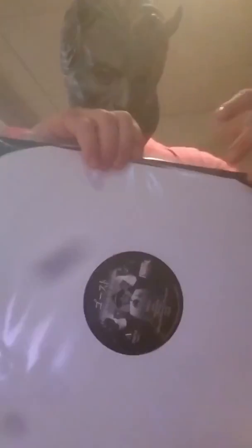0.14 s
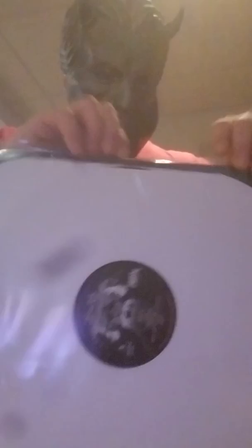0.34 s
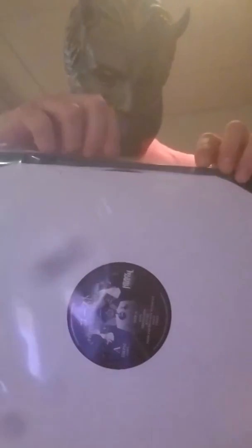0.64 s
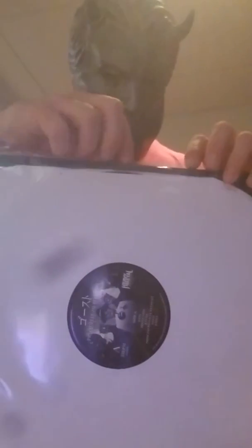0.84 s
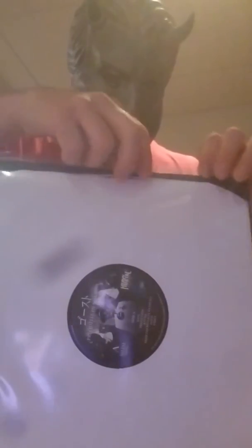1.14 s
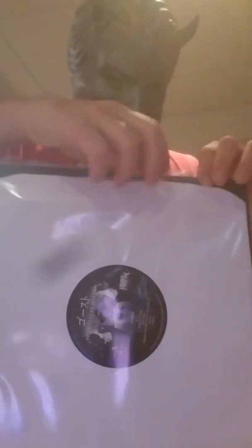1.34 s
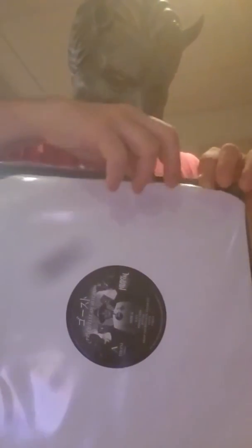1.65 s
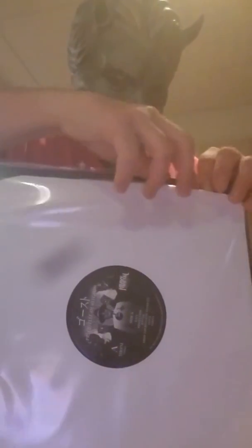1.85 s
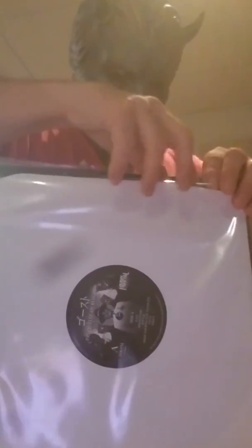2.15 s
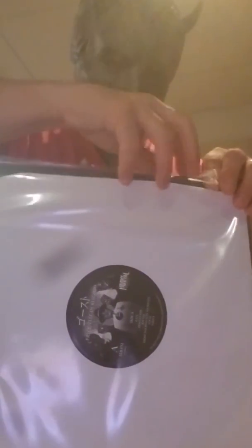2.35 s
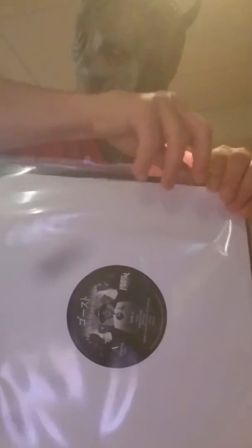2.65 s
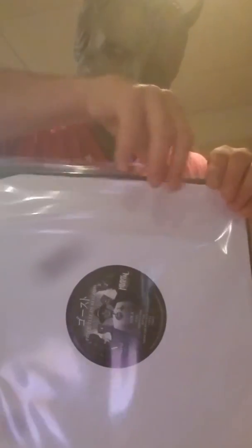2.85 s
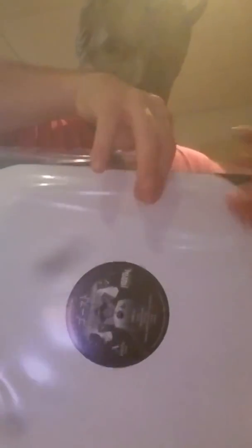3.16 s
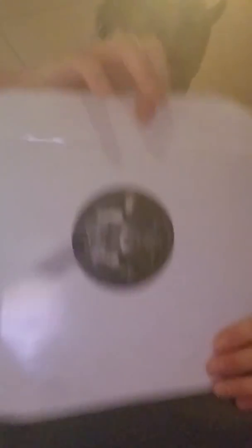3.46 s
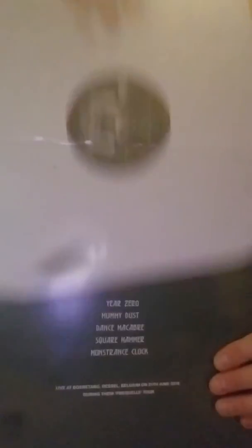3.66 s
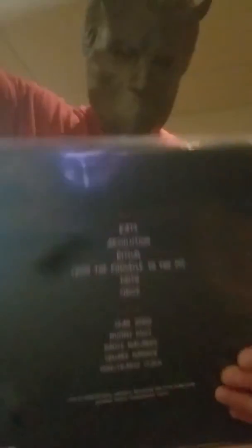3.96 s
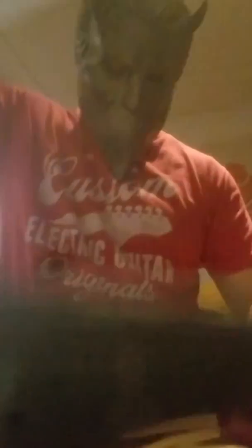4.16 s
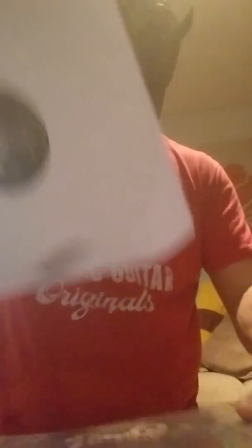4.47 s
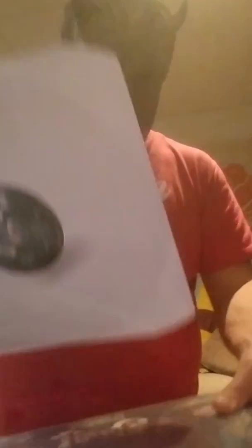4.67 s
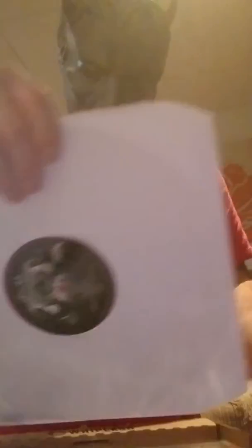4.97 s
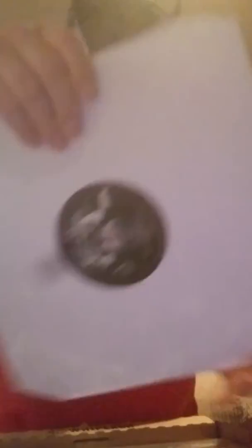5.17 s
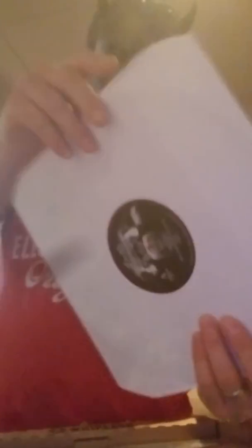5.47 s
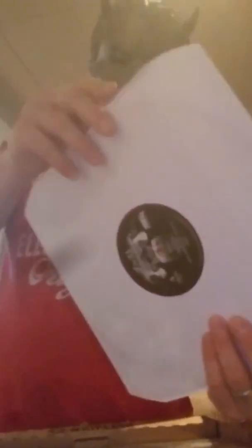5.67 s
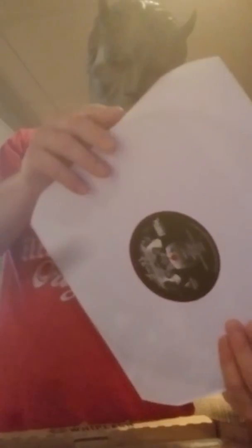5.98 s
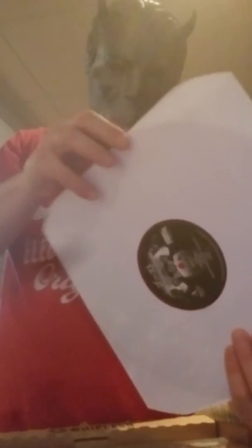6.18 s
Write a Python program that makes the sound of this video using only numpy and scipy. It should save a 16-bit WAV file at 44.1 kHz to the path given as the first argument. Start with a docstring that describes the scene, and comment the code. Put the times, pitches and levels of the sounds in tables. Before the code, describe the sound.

A fan hums low and steady in a small room while a record is unpacked near a phone microphone. First comes uneven rubbing and crackling of a plastic cover, then tiny creaks of card and the smooth swish of a paper sleeve being drawn out. After a short lull, the jacket clatters softly onto a table. The sleeved record is turned in the hands with light rustles, taps and one final knock.

```python
"""A fan hums in a small room while fingers rub and snap a plastic cover: sliding friction makes the hiss,
buckling creases the snaps. At 3 s the card jacket creaks open and a paper-sleeved disc slides out in one
long pull. From 4.25 s the jacket is laid on a table, each impact ringing its damped modes; then the
sleeve is turned, rustling, to a last knock. A phone hears it all through two microphone ports."""
import sys
import numpy as np
from scipy import signal
from scipy.fft import rfft, irfft, next_fast_len
from scipy.io import wavfile
from scipy.ndimage import uniform_filter1d, map_coordinates

SR = 44100
rng = np.random.default_rng(int(sys.argv[2]) if len(sys.argv) > 2 else 0)


def unload_audio(sound):
    """Save the sound as a 16-bit wav file, at the path given as the first command line argument."""
    columns = np.transpose(np.atleast_2d(sound))
    # keep every value between -1 and 1, then stretch to whole-number steps
    steps = np.round(np.clip(columns, -1, 1) * 32767)
    wavfile.write(sys.argv[1], SR, steps.astype(np.int16))


N = 279594


def gain_of(db):
    """Amplitude ratio of a level in decibels."""
    return 10 ** (np.asarray(db) / 20)


def unit_rms(x):
    """Normalisation to unit mean power."""
    return x / np.sqrt(np.mean(x ** 2) + 1e-20)


def curve_at(points, hz):
    """Interpolation on a logarithmic frequency axis."""
    point_hz, value = np.transpose(points)
    return np.interp(np.log(hz + 1), np.log(point_hz + 1), value)


def add(mix, start_s, sound):
    """Superposition: a sound sums into the mix from start_s on."""
    part = mix[..., round(start_s * SR):][..., :sound.shape[-1]]
    part += sound[..., :part.shape[-1]]


def filtered(x, response_db):
    """Linear filtering: the spectrum is multiplied by a frequency response."""
    size = next_fast_len(x.shape[-1] + 512)
    response = gain_of(response_db(np.fft.rfftfreq(size, 1 / SR)))
    return irfft(rfft(x, size) * response, size)[..., :x.shape[-1]]


# Likeness of diffuse sound at the two ports: frequency_hz, coherence
COHERENCE = [(60, 0.93), (170, 0.96), (600, 0.98), (1400, 0.4), (8000, 0.027)]

def diffuse_spectra(noises, size):
    """Spatial coherence: two noises become short-time spectra that are alike at long wavelengths."""
    hz, t, (left, other) = signal.stft(noises, SR, nperseg=size, noverlap=size * 3 // 4)
    coherence = np.clip(curve_at(COHERENCE, hz), 0, 1)[:, None]
    right = coherence * left + np.sqrt(1 - coherence ** 2) * other
    return hz, t, np.array([left, right])


# Spectrum of the room air: frequency_hz, relative_density_db
AIR_SPECTRUM = [(30, -23), (55, -9), (110, -5.5), (170, -4.5), (250, -8.5), (335, -10), (500, -21),
                (640, -12.5), (900, -39.5), (1400, -47), (9000, -82)]
# Hum lines of the fan: pitch_hz, bandwidth_hz, level_db
FAN_LINES = [(110.9, 11, -60.5), (172, 11.6, -49.5)]

def air_and_fan(air_db=-53, swell_db=0.5):
    """Broadband room noise lies under the fan's tones, which random modulation broadens into bands."""
    hz, t, spectra = diffuse_spectra(rng.standard_normal((2, N)), size=2048)
    swell = unit_rms(uniform_filter1d(rng.standard_normal(len(t)), size=20))
    spectra *= gain_of(curve_at(AIR_SPECTRUM, hz)[:, None] - swell_db * swell)
    noise = signal.istft(spectra, SR, nperseg=2048, noverlap=1536)[1]
    out, time = gain_of(air_db) * unit_rms(noise[:, :N]), np.arange(N) / SR
    for pitch_hz, bandwidth_hz, level_db in FAN_LINES:
        pole = np.exp(-np.pi * bandwidth_hz / SR)
        waver = signal.lfilter([1], [1, -pole], rng.standard_normal(N) + 1j * rng.standard_normal(N))
        amplitude = 2.3 + waver / np.sqrt(np.mean(abs(waver) ** 2))  # a steady and a wandering part
        out += gain_of(level_db) * unit_rms((amplitude * np.exp(2j * np.pi * pitch_hz * time)).real)
    return out


# Reverberation time of the room: frequency_hz, t60_s
ROOM_DECAY = [(100, 0.6), (1000, 0.38), (6000, 0.047), (15000, 0.4)]

def reverberation(sound, spacing=20):
    """Convolution with sparse reflections of random sign; each band decays exponentially at its own rate."""
    reflections = np.zeros((2, SR // 2))
    slots = np.arange(200, SR // 2 - spacing, spacing)
    arrivals = slots + rng.integers(0, spacing, (2, len(slots)))
    np.put_along_axis(reflections, arrivals, rng.choice([-1., 1.], arrivals.shape), 1)
    hz, t, spectra = signal.stft(reflections, SR, nperseg=256)
    decay = gain_of(-60 * t / curve_at(ROOM_DECAY, hz)[:, None])
    tail = signal.istft(spectra * decay, SR, nperseg=256)[1]
    return signal.fftconvolve(sound, tail / np.linalg.norm(tail[0]), axes=1)[:, :N]


# Slips of the jacket mouth as it is prised open: start_s, level_db
JACKET_SLIPS = [(3.054, -30), (3.096, -33), (3.156, -35)]

def jacket_creaks(pitch_hz=910, t60_s=0.03, rise_s=0.00073):
    """Stick-slip excitation: each slip of card rings the hollow of the jacket at a wavering pitch."""
    out, t = np.zeros(N), np.arange(3000) / SR
    for start_s, level_db in JACKET_SLIPS:
        jitter = rng.standard_normal(len(t))
        bend = jitter + 2 * unit_rms(uniform_filter1d(jitter, size=80))
        envelope = gain_of(level_db - 60 * t / t60_s) * (1 - np.exp(-t / rise_s))
        add(out, start_s, envelope * np.sin(2 * np.pi * pitch_hz * np.cumsum(1 + 0.029 * bend) / SR))
    return out


# Modes of the struck board: pitch_hz, relative_level_db, t60_s
BOARD_MODES = [(46.3, -7, 0.34), (79.7, 1, 0.17), (107, -1.5, 0.063), (155, 3.5, 0.11), (216.4, -4.5, 0.12),
               (257, 5.5, 0.025), (424, -0.5, 0.059), (536, 4, 0.022), (755, 7, 0.013), (994, 17, 0.0032)]
# Blows of card and disc on fingers and table: start_s, peak_db, centre_hz
BLOWS = [(0.061, -19.5, 386), (0.078, -27, 195), (0.139, -26.5, 128), (0.311, -24, 288), (0.319, -22, 440),
         (0.5136, -28, 470), (1.841, -41, 700), (2.6272, -33, 550), (3.764, -33.5, 443),
         (4.253, -20.5, 241), (4.273, -19, 162), (4.291, -24.5, 170), (4.334, -23.5, 165),
         (4.367, -25.5, 203), (4.415, -26.5, 162), (4.545, -32.5, 770), (4.587, -29.5, 185),
         (4.691, -33, 430), (4.789, -33.5, 550), (4.916, -27.5, 516), (4.926, -24.5, 167),
         (4.9579, -20.5, 260), (4.963, -21.5, 640), (5.018, -31.5, 520), (5.152, -32.5, 362),
         (5.211, -33.5, 710), (5.372, -32, 684), (6.159, -23, 500)]

def card_knocks(rattle_s=0.025, rattle_samples=2000):
    """Modal resonance: a rattling contact rings the board, favouring modes near the blow's centre_hz."""
    out, t = np.zeros(N), np.arange(9000) / SR
    pitch_hz, mode_db, t60_s = np.transpose(BOARD_MODES)[:, :, None]
    signs = (-1.) ** np.arange(len(BOARD_MODES))[:, None]  # neighbouring modes swing in opposite senses
    for start_s, peak_db, centre_hz in BLOWS:
        rattle = 0.056 * rng.standard_normal(rattle_samples) * np.exp(-t[:rattle_samples] / rattle_s)
        rattle[:20] += 0.22 * np.hanning(20)  # the first touch, a short push
        excitation_db = np.maximum(-9 * np.log2(pitch_hz / centre_hz) ** 2, -17)
        detune = 1 + 0.014 * rng.standard_normal(pitch_hz.shape)  # the grip shifts the modes a little
        envelopes = gain_of(mode_db + excitation_db - 60 * t / t60_s)
        ring = (signs * envelopes * np.sin(2 * np.pi * pitch_hz * detune * t)).sum(0)
        knock = signal.fftconvolve(ring, rattle)
        add(out, start_s, gain_of(peak_db) * knock / abs(knock).max())
    return out


# Spectrum radiated by the sheets: frequency_hz, relative_density_db
SHEET_SPECTRUM = [(110, -26), (290, -6), (500, -0.5), (1060, -7), (1300, -9.5), (1870, -1.5), (3590, -5),
                  (4870, -0.5), (6140, -2.5), (7000, -7), (9360, -12.5), (11100, -8.5), (12300, -3.5),
                  (15100, -4.5), (16000, -12.5)]

def sheet_response_db(hz, fineness_db, hollow_db, pocket_hz=2345, pocket_octaves=0.42, neutral_db=-8.5):
    """Spectral shaping: fineness tilts treble over middle; hollowness lifts the trapped air's resonance."""
    grid_hz = np.arange(1500., 15500., 100.)
    power = gain_of(2 * curve_at(SHEET_SPECTRUM, grid_hz))
    own_fineness_db = 10 * np.log10(power[grid_hz > 9000].sum() / power[grid_hz < 8000].sum())
    tilt_db = np.log2(np.clip(hz, 3000, 12000) / 4000) / 1.6 * (fineness_db - own_fineness_db)
    pocket = 0.93 * np.exp(-(np.log2((hz + 1) / pocket_hz) / pocket_octaves) ** 2)
    pocket -= 1.9 * np.clip(np.log2(1700 / (hz + 1)) / 1.35, 0, 1)  # little radiates below the resonance
    return curve_at(SHEET_SPECTRUM, hz) + tilt_db + pocket * (hollow_db - neutral_db)


# Light contact of the sheets, and the long pull of the disc: time_s, level_db, fineness_db, hollow_db
SLIDING_CONTACT = [(0.0, -60.5, -8.5, -10.5), (0.6, -52, -7.5, -8.5), (1.2, -59.5, -5.5, -7),
                   (1.7, -47.5, -7.5, -4), (1.87, -55.5, -6.5, -6), (2.5, -50, -7.5, -3),
                   (3.109, -53, -12.5, -7.5), (3.219, -42.5, 1, -8.5), (3.35, -39, -5.5, -9),
                   (3.779, -36, 7.5, -5), (3.83, -43, -10, -8.5), (4.02, -78.5, -1, -11),
                   (4.4, -58, -9, -9.5), (4.851, -52, -4, -11), (5.1, -65.5, 0, -10.5),
                   (5.75, -76, -12, -6), (6.0, -57, -6.5, -6.5), (6.34, -48, -18, -9)]
# Separate strokes of fingers and sheets: start_s, rise_s, length_s, level_db, fineness_db
FINGER_STROKES = [(0.0, 0.0024, 0.078, -45.5, -2.5), (0.261, 0.047, 0.18, -40.5, -4.5),
                  (0.47, 0.033, 0.096, -40, -3), (0.671, 0.1, 0.18, -44, -7),
                  (1.035, 0.053, 0.17, -45, -10.5), (1.294, 0.016, 0.029, -43, -6.5),
                  (1.406, 0.022, 0.051, -42.5, -10), (1.552, 0.061, 0.06, -37.5, -11),
                  (1.892, 0.013, 0.062, -35.5, -13), (1.998, 0.016, 0.28, -48.5, -10),
                  (2.21, 0.051, 0.056, -49, 2), (2.37, 0.13, 0.16, -38, -9),
                  (2.565, 0.01, 0.07, -34.5, -9.5), (2.666, 0.076, 0.36, -39, -3.5),
                  (3.012, 0.014, 0.069, -44.5, -0.5), (4.071, 0.087, 0.26, -48, -4),
                  (4.254, 0.0065, 0.047, -38, -24), (4.46, 0.036, 0.022, -36.5, -8),
                  (4.535, 0.015, 0.034, -48, -6), (4.584, 0.074, 0.13, -46, -1.5),
                  (4.7, 0.2, 0.11, -36.5, -17), (4.901, 0.01, 0.14, -49, -17),
                  (5.141, 0.003, 0.09, -40, 7.5), (5.217, .015, 0.012, -36.5, -13),
                  (5.315, 0.023, 0.13, -42.5, 0.5), (5.497, 0.0073, 0.032, -45.5, 1.5),
                  (5.566, 0.028, 0.051, -47, 0), (5.637, 0.043, 0.057, -49, 4.5),
                  (5.737, 0.03, .14, -52.5, 5), (5.898, 0.056, 0.054, -43, 7.5),
                  (6.072, 0.014, 0.088, -38.5, -2), (6.235, 0.037, 0.15, -52.5, 8)]

def handling(t, swell_db=21.5, sag_db_per_s=34, release_db_per_s=351):
    """Incoherent addition: strokes and contact sum in power, and the louder one sets the fineness."""
    time_s, contact_db, contact_fineness_db, hollow_db = np.transpose(SLIDING_CONTACT)
    start_s, rise_s, length_s, stroke_db, stroke_fineness_db = np.transpose(FINGER_STROKES)[:, :, None]
    age_s, rise_s = t - start_s, np.maximum(rise_s, .003)
    envelope_db = (swell_db * np.minimum(age_s / rise_s - 1, 0)
                   - sag_db_per_s * np.maximum(age_s - rise_s, 0)
                   - release_db_per_s * np.maximum(age_s - length_s, 0))
    strokes = gain_of(2 * (stroke_db + envelope_db))
    contact = gain_of(2 * np.interp(t, time_s, contact_db))
    power = contact + strokes.sum(0)
    weighted = contact * np.interp(t, time_s, contact_fineness_db) + (strokes * stroke_fineness_db).sum(0)
    return 10 * np.log10(power), weighted / power, np.interp(t, time_s, hollow_db)


def sheet_rubbing(crackles_per_s=250, crackle_s=0.00095, hiss=5.1, flicker_db=1.5, patchy_db=1.98):
    """Friction noise: random crackles over a hiss, filtered by the sheets; slow strokes are rougher."""
    time = np.arange(N) / SR
    _, fineness_db, _ = handling(time[::64])
    roughness = np.clip(-np.interp(time, time[::64], fineness_db) / 8, .1, 1.1)
    impulses = rng.exponential(3.3, N) * (rng.random(N) < crackles_per_s * roughness / SR)
    crackles = signal.lfilter([1], [1, -np.exp(-1 / (crackle_s * SR))], impulses)
    hz, t, spectra = diffuse_spectra((hiss + crackles) * rng.standard_normal((2, N)), size=256)
    spectra *= 0.76 / np.sqrt(np.mean(abs(spectra) ** 2))
    level_db, fineness_db, hollow_db = handling(t)
    colour = gain_of(sheet_response_db(hz[:, None], fineness_db, hollow_db))
    middle = (hz > 1500) & (hz < 8000)  # this band carries the level
    colour *= gain_of(level_db) / np.linalg.norm(colour[middle], axis=0)
    # Uneven contact: the level flickers as a whole and in patches of time and frequency.
    flicker = unit_rms(uniform_filter1d(rng.standard_normal(len(t)), size=8))
    patches = uniform_filter1d(rng.standard_normal((len(hz), len(t))), size=14, axis=1)
    patches = unit_rms(uniform_filter1d(patches, size=6, axis=0))
    depth = np.interp(t, time, roughness)
    uneven_db = flicker_db * depth * flicker + patchy_db * (1 + depth) / 2 * patches
    return signal.istft(spectra * colour * gain_of(uneven_db), SR, nperseg=256, noverlap=192)[1][:, :N]


# Creases snapping and edges scuffing: start_s, peak_db, fineness_db, t60_s
CREASES = [(0.3117, -23.5, -36, 0.0074), (0.3213, -20.5, 2, 0.02), (0.3568, -18.5, -6.5, 0.015),
           (0.3945, -25, -2, 0.0088), (0.4189, -14.5, -7.5, 0.0049), (0.5158, -27, -31, 0.016),
           (0.52, -19.5, -4, 0.026), (0.848, -26.5, -14, 0.0085), (0.9657, -28.5, -11.5, 0.003),
           (1.1012, -25, -25, 0.003), (1.5597, -24, -18, 0.0019), (1.6064, -23.5, -8, 0.03),
           (1.882, -31, -40, 0.0064), (2.0662, -17.5, -9, 0.025), (2.5873, -13.5, -11, 0.0087),
           (2.6209, -15, -13, 0.029), (2.625, -10, -11, 0.0098), (3.039, -17, -18, 0.026),
           (3.051, -19.5, -20.5, 0.032), (3.0923, -16, -8.5, 0.012), (3.154, -27, -11, 0.0053),
           (4.098, -35.5, -6, 0.013), (4.2525, -5.5, 1.5, 0.0053), (4.2599, -4, -6, 0.0039),
           (4.2983, -24, 10, 0.0045), (4.3027, -17.5, 6, 0.013), (4.312, -26, 9, 0.013),
           (4.3658, -27, -3, 0.025), (4.4806, -25, -36, 0.014), (4.4972, -14, -2.5, 0.029),
           (4.5452, -27.5, -48, 0.064), (4.7661, -28.5, -48, 0.021), (4.7871, -19, 5, 0.016),
           (4.925, -22.5, -10, 0.051), (4.957, -18.5, -13, 0.015), (4.977, -16.5, -1, 0.03),
           (4.992, -32, 2, 0.01), (5.022, -31, 5, 0.0071), (5.1484, -26, -29, 0.091),
           (5.212, -14.5, 3, 0.0098), (5.313, -34.5, 3, 0.01), (5.371, -24, 0, 0.012),
           (5.7775, -30, 2.5, 0.035), (6.151, -20, -22, 0.071)]

def crease_snaps(shared=0.57, ragged_db=3, hollow_db=-5.0, decay_power=1.6, ripple_db=3.0):
    """Buckling: a crease lets go at once, with a click and a noise burst filtered by the sheets."""
    out, t = np.zeros((2, N)), np.arange(3000) / SR
    click = 1.42 * (t * SR // 2 == 2)
    for start_s, peak_db, fineness_db, t60_s in CREASES:
        noise = rng.standard_normal((4, len(t)))
        common, per_port, irregularity = noise[0], noise[1:3], noise[3]
        envelope = gain_of(-60 * (t / max(t60_s, .002)) ** decay_power) * (1 - np.exp(-t * SR / 2))
        envelope *= gain_of(ragged_db * unit_rms(uniform_filter1d(irregularity, size=30)))  # yields in steps
        drive = (shared * common + (1 - shared) * per_port + click) * envelope
        patch_db = ripple_db * irregularity[::100]  # each crease rings its own patch of sheet
        patch_hz = np.linspace(0, SR / 2, len(patch_db))
        burst = filtered(drive, lambda hz: sheet_response_db(hz, fineness_db, hollow_db)
                         + np.interp(hz, patch_hz, patch_db))
        add(out, start_s, gain_of(peak_db) * burst / abs(burst).max())
    return out


# Path difference as the hands move across the ports: time_s, left_delay_s
HAND_DELAY = [(0.6, -.0001), (1.0, .0003), (5.0, .0002), (5.6, -.00015)]

def scene(reverberation_db=-15.0):
    """Superposition of the direct sound of the handling, its reverberant field and the room noise."""
    sheets = sheet_rubbing() + crease_snaps()
    samples = np.arange(N)
    delay_s = np.interp(samples / SR, *np.transpose(HAND_DELAY))
    sheets[0] = map_coordinates(sheets[0], [samples - SR * delay_s], order=5)
    card = (card_knocks() + jacket_creaks()) * gain_of([[-2.5], [0]])  # the table is nearer the right port
    direct = sheets + card
    return direct + gain_of(reverberation_db) * reverberation(direct) + air_and_fan()


# Difference in sensitivity of the ports: frequency_hz, left_minus_right_db
PORT_DIFFERENCE = [(60, -1), (290, -2), (640, -7.5), (1410, -6), (3100, -5.5), (6820, -16.5), (15000, -8)]

def record(dry, gain_db=1.55, cutoff_hz=15850):
    """Frequency response of the phone: the left port is duller and quieter, and both are band-limited."""
    shares = np.array([[0.69], [-0.3]])  # of the difference: left, right
    ports = filtered(dry, lambda hz: gain_db + shares * curve_at(PORT_DIFFERENCE, hz))
    lowpass = signal.firwin(511, cutoff_hz, window=("kaiser", 9), fs=SR)
    return signal.oaconvolve(ports, lowpass[None], "same")


dry = scene()
out = record(dry)
unload_audio(out)
```